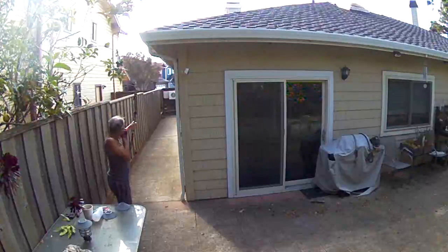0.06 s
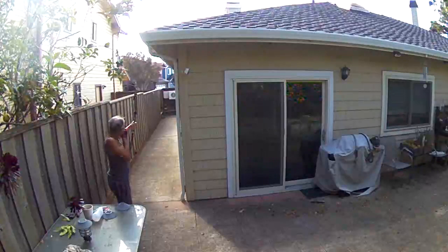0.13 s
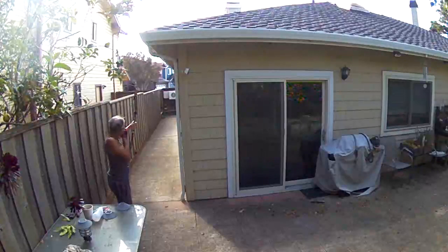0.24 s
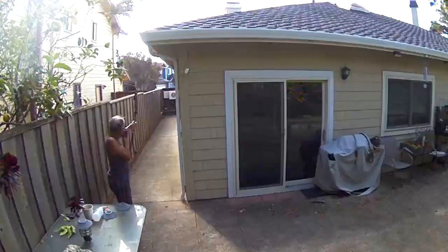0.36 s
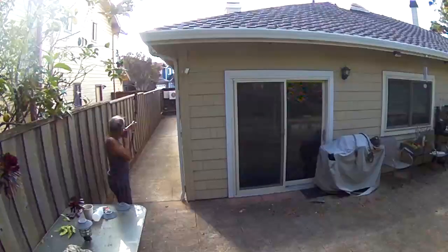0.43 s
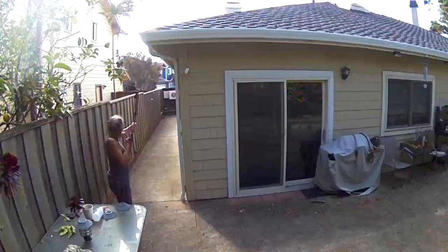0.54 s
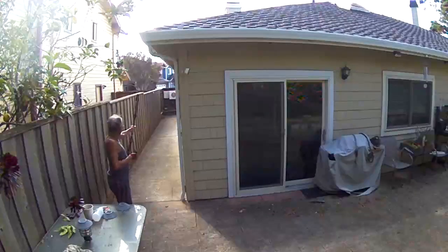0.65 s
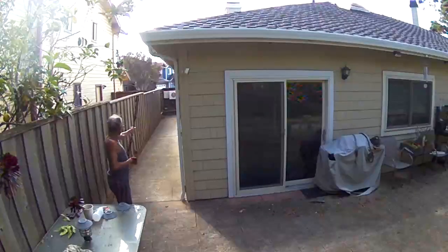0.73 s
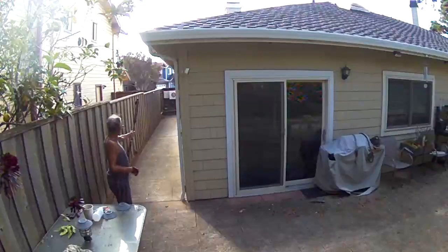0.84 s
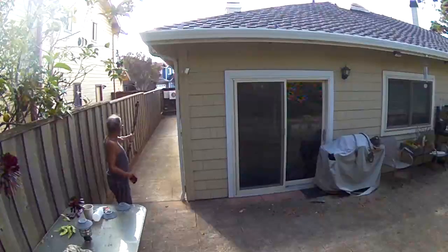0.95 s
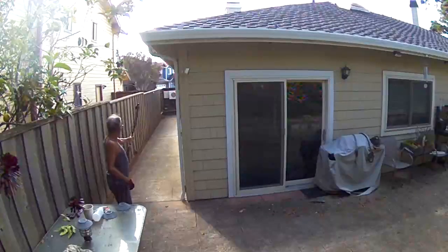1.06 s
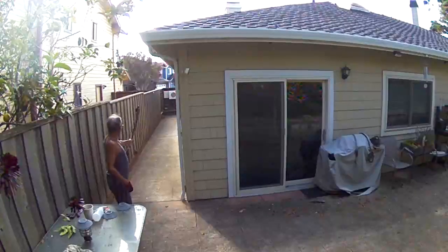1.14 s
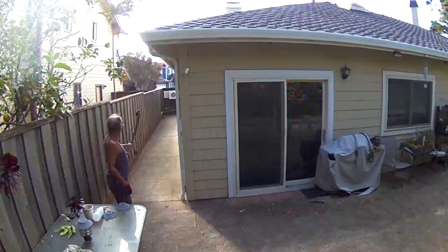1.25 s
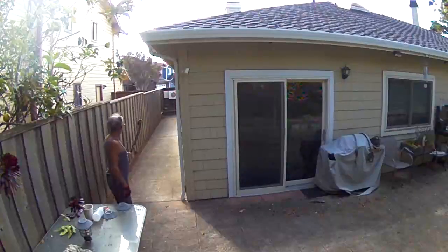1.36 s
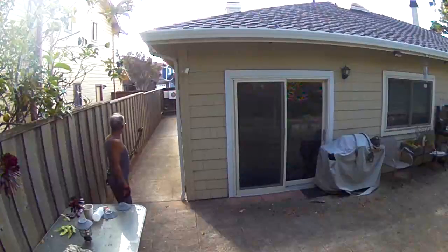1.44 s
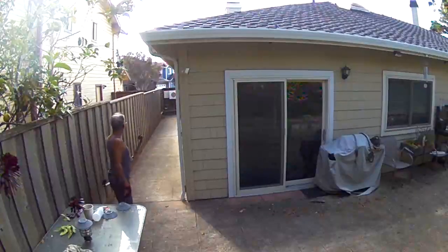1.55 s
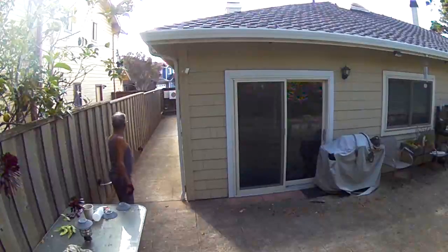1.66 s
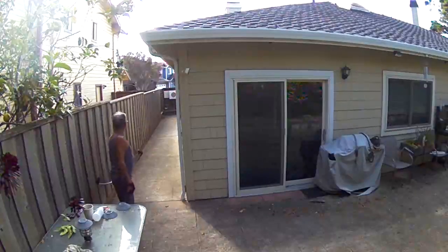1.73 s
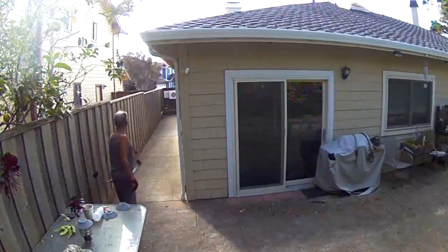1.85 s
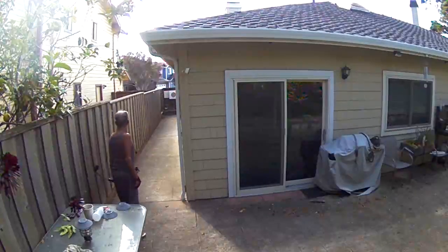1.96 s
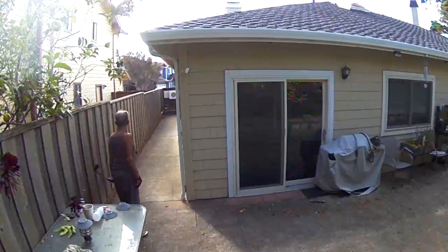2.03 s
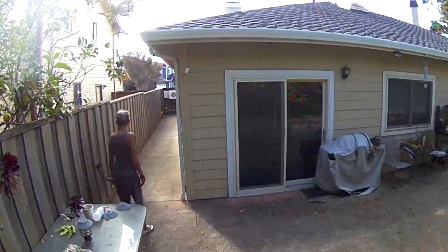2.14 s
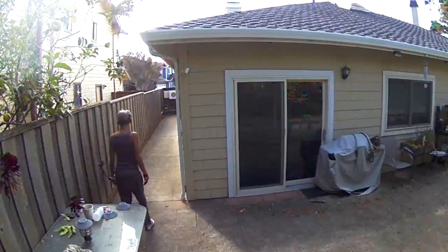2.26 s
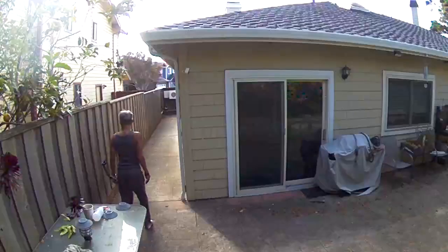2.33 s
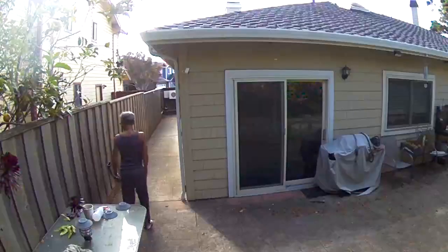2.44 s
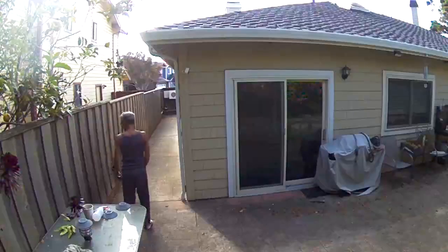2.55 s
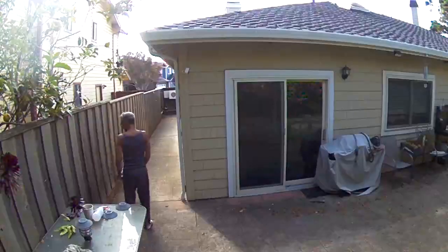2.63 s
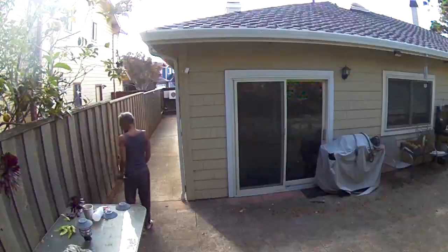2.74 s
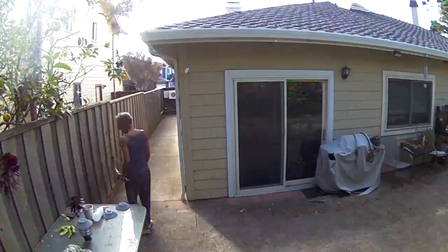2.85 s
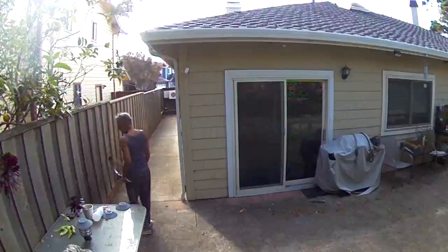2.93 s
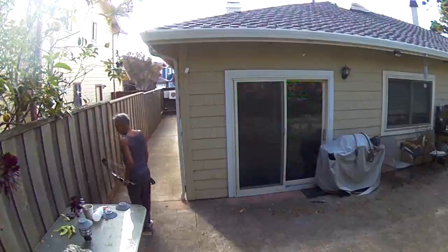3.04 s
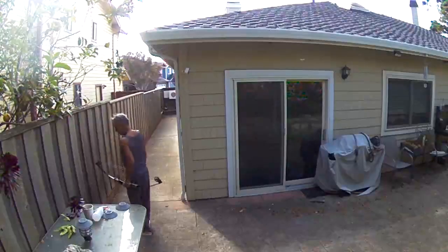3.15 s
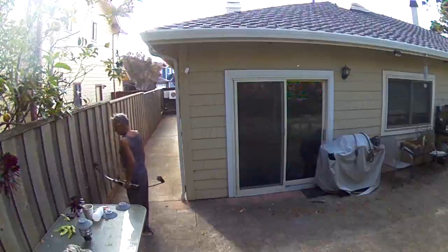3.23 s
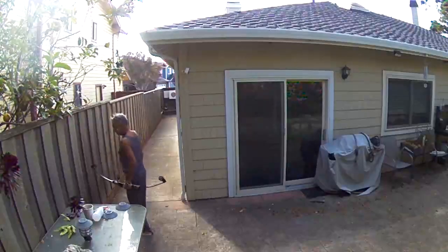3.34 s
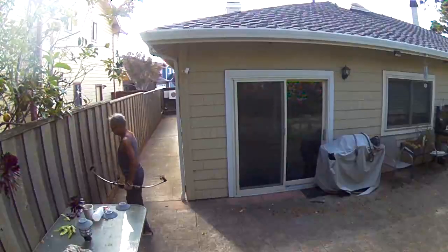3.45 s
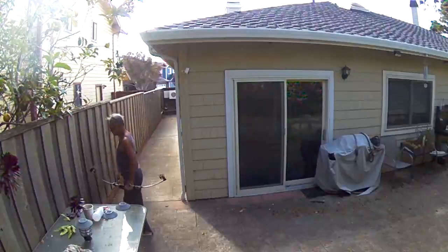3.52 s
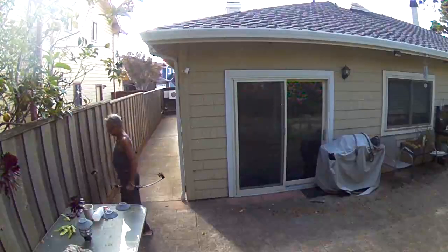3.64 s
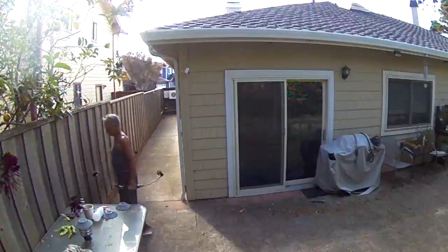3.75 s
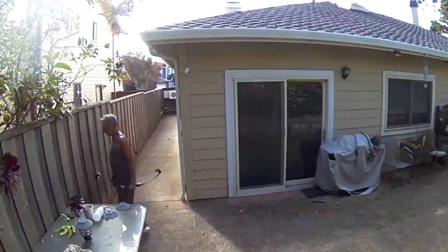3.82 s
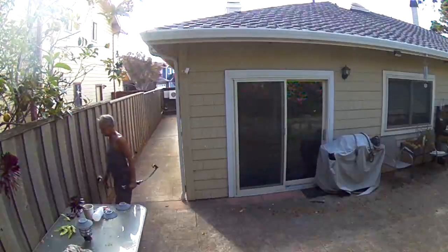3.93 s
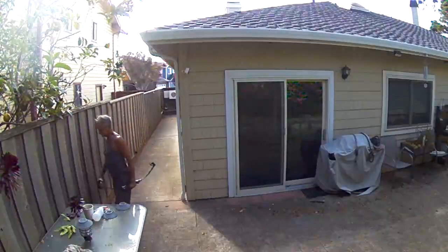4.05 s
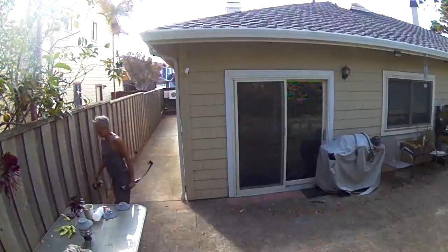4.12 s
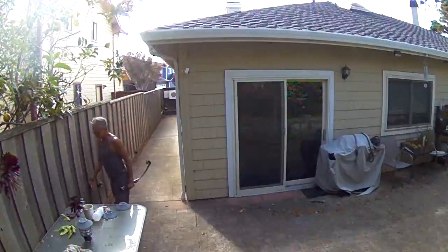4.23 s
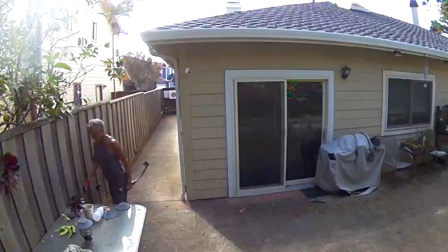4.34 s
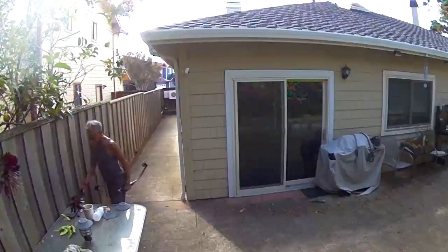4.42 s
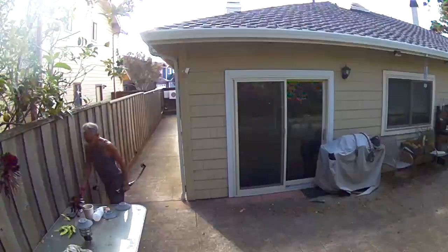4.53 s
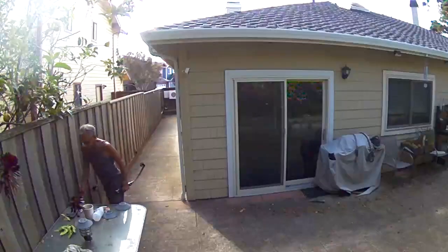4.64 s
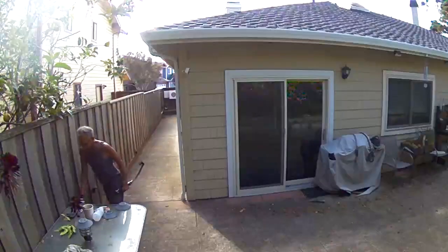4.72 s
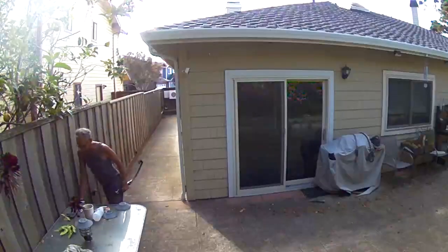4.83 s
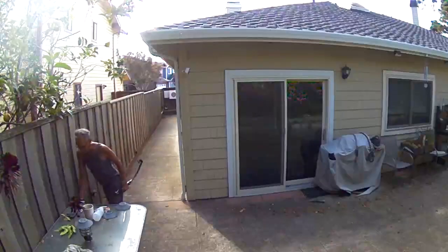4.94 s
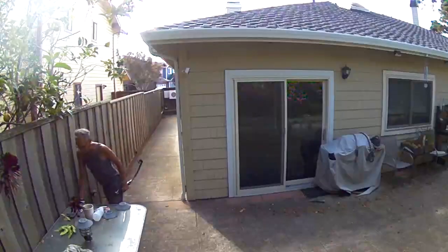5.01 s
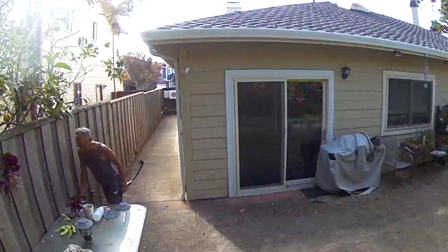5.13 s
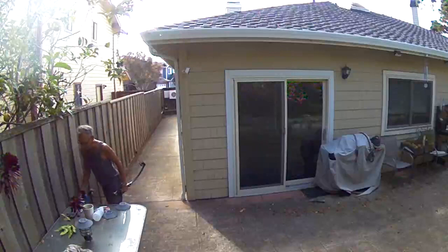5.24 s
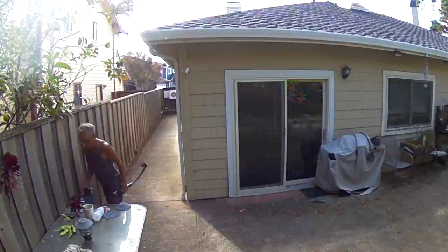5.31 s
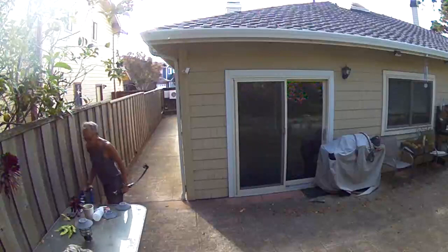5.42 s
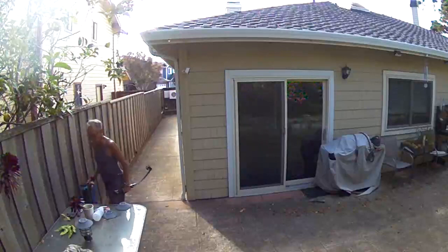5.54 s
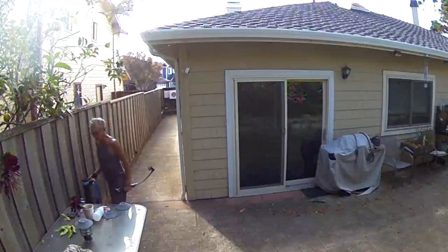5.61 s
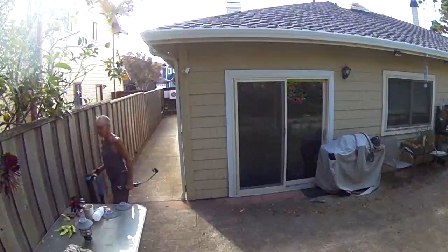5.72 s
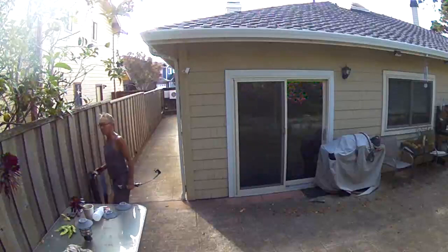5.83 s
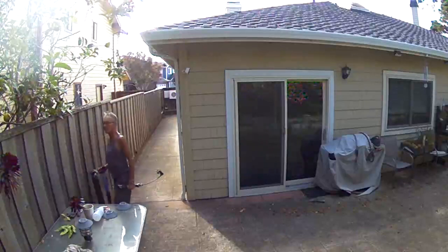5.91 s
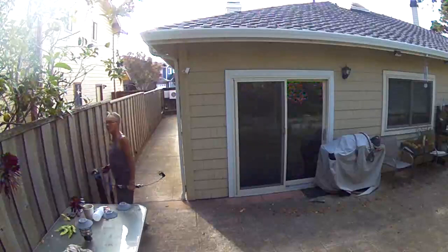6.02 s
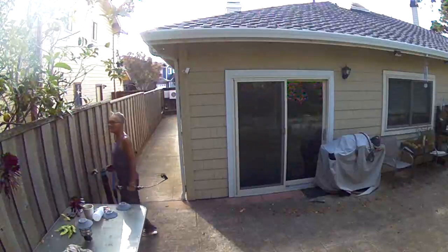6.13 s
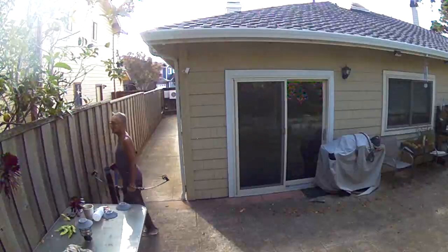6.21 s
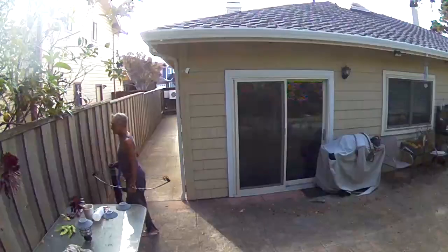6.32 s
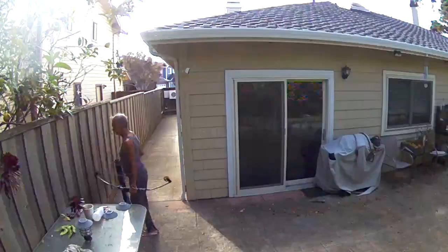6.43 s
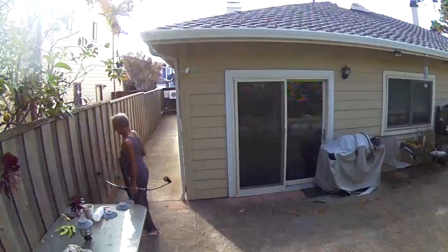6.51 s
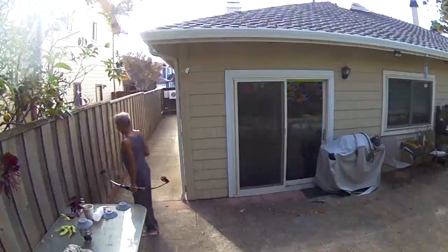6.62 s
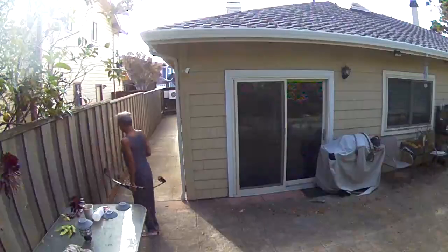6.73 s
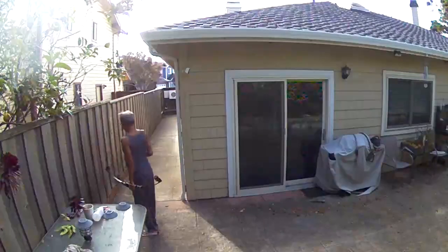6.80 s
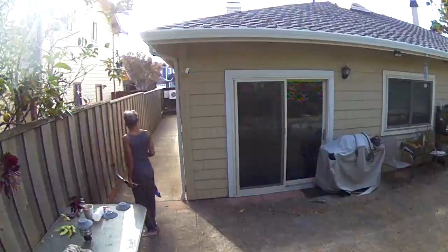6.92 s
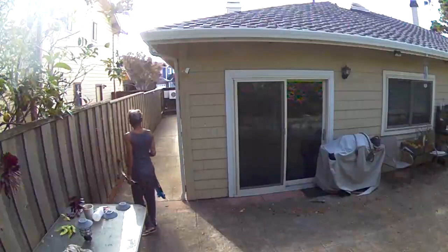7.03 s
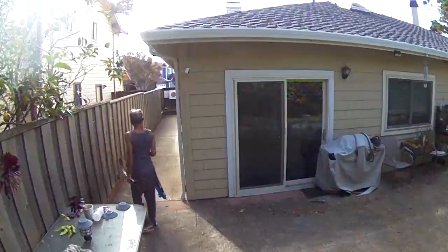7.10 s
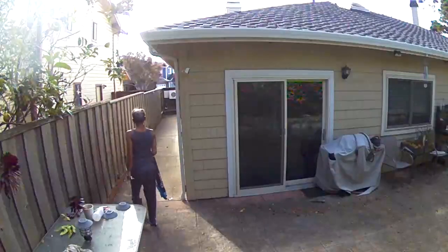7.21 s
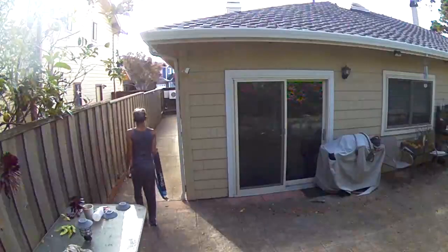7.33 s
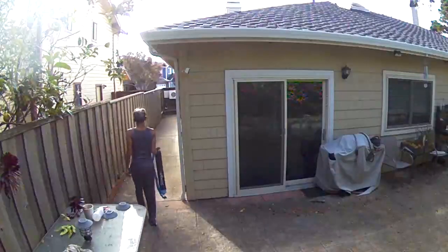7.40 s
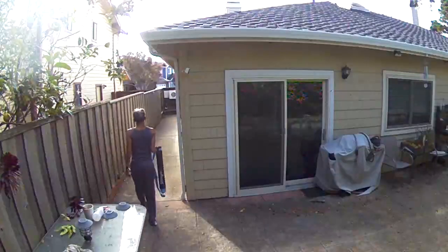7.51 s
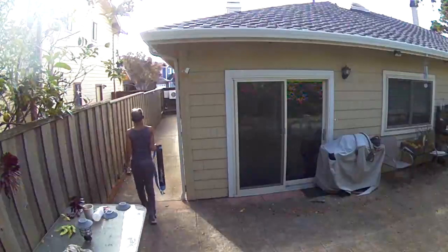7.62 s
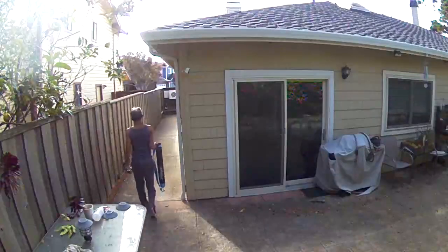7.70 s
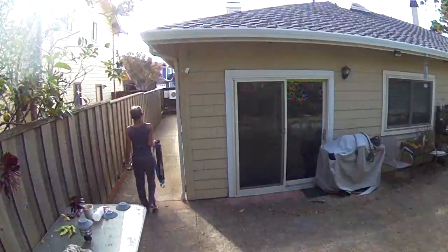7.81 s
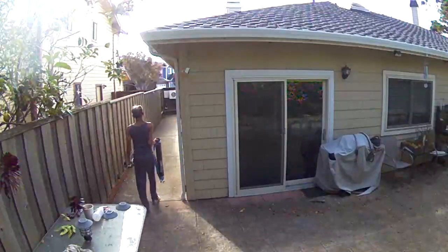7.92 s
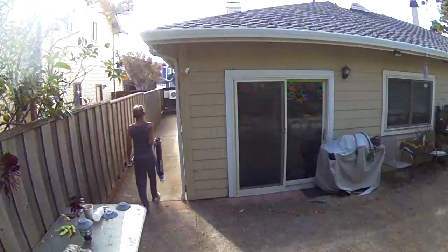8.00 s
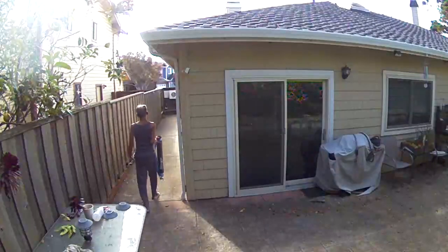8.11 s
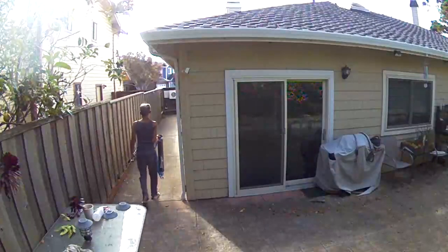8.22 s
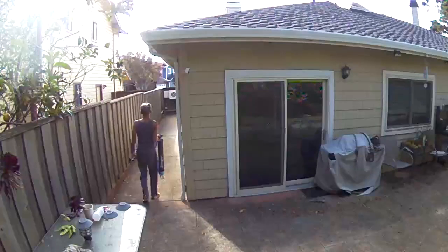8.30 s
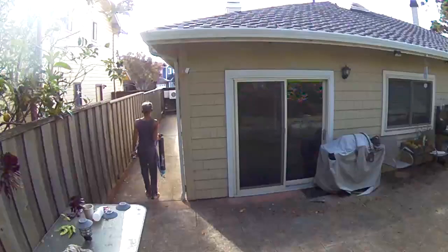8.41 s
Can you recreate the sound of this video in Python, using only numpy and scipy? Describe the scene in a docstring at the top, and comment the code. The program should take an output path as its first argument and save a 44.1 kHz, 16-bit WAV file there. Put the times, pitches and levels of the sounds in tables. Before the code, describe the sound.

A quiet backyard alley between a house wall and wooden fence, heard by one fixed microphone with muted highest treble. Low outdoor rumble, faint hiss and a distant vehicle drone that fades over the first few seconds. At 0.6 s a bow releases: a very quick, bright, dry snap with a hissing, fluttering echo and faint low string hum. At 1.1 s the arrow strikes the target: a loud woody boom with tearing crunch, clap-like reflections and a short ringing tail. A dull bump at 1.6 s, then faint gritty scuffs from 1.8 to 4 s, with wind puffs around 3 to 3.6 s. At 4.4 s a tiny falling squeak and rub. From 5.1 to 5.8 s arrows rattle in a quiver, with hard knocks at 5.28 and, loudest, 5.41 s. Soft scuffs follow, a sharp footfall clack at 7.05 s, and crunchy steps at 7.6, 7.8 and 8.1 s.

```python
"""An archer's bow snaps: a run of bright noise bursts looses an arrow down an alley between house and fence.
Half a second later it thuds into the target: ringing tones and tearing noise, with echoes from the alley.
The archer shuffles on gritty concrete (bursts of tiny clicks), gives a falling squeak, lifts a rattling
quiver (knocks with ringing shafts) and takes some steps, over low outdoor rumble and puffs of wind (noise)."""
import sys
import numpy as np
from scipy import signal
from scipy.fft import rfft, irfft
from scipy.io import wavfile
from scipy.ndimage import uniform_filter1d

SR = 44100
rng = np.random.default_rng(int(sys.argv[2]) if len(sys.argv) > 2 else 0)


def dump_mix(stems):
    """Bounce the given channels to the path in sys.argv[1] as a 16-bit WAV at rate SR."""
    frames = np.atleast_2d(stems).T  # one column per channel
    limited = np.clip(frames, -1, 1)  # hard clip at full scale
    pcm = np.round(limited * 32767).astype(np.int16)
    wavfile.write(sys.argv[1], SR, pcm)


N = 373086  # length of the scene [samples]
EDGE_HZ = 7570  # upper edge of the sound [Hz]
T = np.arange(SR) / SR  # one second, the longest life of a single dry sound [s]
HZ = np.fft.rfftfreq(4096, 1 / SR)  # frequencies at which the colouring filters are drawn [Hz]

# colour of grit under a shoe: (frequency [Hz], relative level [dB])
GRIT_COLOUR = [(300, -22.5), (800, -8.5), (1500, -5), (2000, 2.5), (3000, -0.5), (4200, 2), (5500, 1.5),
               (6800, 0.5), (7600, -15.5)]
# colour the quiver's tube gives to knocks: (frequency [Hz], relative level [dB])
QUIVER_COLOUR = [(180, -32), (350, -15.5), (550, -9), (750, -2.5), (980, -6), (1250, -9), (1650, -8.5),
                 (2050, -4.5), (2450, -10.5), (2950, -6.5), (3600, -12.5), (4900, -9.5), (6000, -16),
                 (6800, -13.5), (7500, -26)]


def gain_of(db):
    """Turns decibels into an amplitude factor."""
    return 10 ** (np.asarray(db) / 20)


def evened(x):
    """Scales a sound to an average strength (rms) of 1."""
    return x / np.sqrt(np.mean(x ** 2) + 1e-20)


def read(points, hz):
    """Reads a table between its points, along a logarithmic frequency axis."""
    f, value = np.transpose(points)
    return np.interp(np.log(hz + 1), np.log(f + 1), value)


def add(mix, s, sound):
    """Mixes a sound in at time s [s]."""
    start = max(round(s * SR), 0)
    part = mix[start:][:len(sound)]
    part += sound[:len(part)]


def colour(x, spectrum, tilt_db=0):
    """Filters with a spectrum tilted by tilt_db per octave above 400 Hz; the filter has unit energy."""
    level = read(spectrum, HZ) + tilt_db * np.log2(np.clip(HZ, 400, EDGE_HZ))
    # folding the cepstrum makes the filter respond as early as it can, never before its input
    cepstrum = irfft(np.log(gain_of(level - level.max()) + 1e-5))
    cepstrum[1:len(HZ) - 1] *= 2
    cepstrum[len(HZ):] = 0
    taps = irfft(np.exp(rfft(cepstrum)))
    taps = taps / np.linalg.norm(taps)
    return signal.fftconvolve(x, taps)[:len(x)]


def swell(rise, t60):
    """Grows to 1 in the rise time [s], then falls by 60 dB in every t60 [s]."""
    rise = max(rise, 1e-4)
    growth = np.minimum(T / rise, 1)
    decay = np.exp(-np.log(1000) * np.maximum(T - rise, 0) / max(t60, 1e-3))
    return growth * decay


def arch(length, skew=1, sharpness=1):
    """Swells and fades within the length [s]; a skew under 1 brings the top forward."""
    return np.abs(np.sin(np.pi * np.minimum(T / length, 1) ** skew)) ** sharpness


def grains(per_s, spread_db):
    """Scatters tiny clicks of uneven size over one second, as rough contacts do."""
    chance, size, sign = rng.random(SR), rng.exponential(1, SR), rng.choice([-1, 1], SR)
    clicks = (chance < per_s / SR) * sign
    return evened(clicks * gain_of(spread_db * np.minimum(size, 4)))


def ring(modes):
    """Sounds dying tones together: (frequency [Hz], level [dB], t60 [s], rise [s])."""
    return sum(gain_of(db) * swell(rise, t60) * np.sin(2 * np.pi * hz * T) for hz, db, t60, rise in modes)


def steady(spectrum):
    """Makes noise of a given colour for the whole scene, by shaping its frequencies."""
    noise = rfft(rng.standard_normal(N))
    return evened(irfft(noise * gain_of(read(spectrum, np.fft.rfftfreq(N, 1 / SR))), N))


def alley_tail():
    """Dense reflections between fence and wall; each pitch dies at its own rate, the lowest most slowly."""
    # how long the echo takes to fall by 60 dB: (frequency [Hz], t60 [s])
    alley_t60 = [(150, 0.62), (300, 0.45), (800, 0.42), (2500, 0.4), (5000, 0.34), (7500, 0.44)]
    hz, t, z = signal.stft(grains(6000, 0), SR, nperseg=256)
    decay = np.exp(-np.log(1000) * t / read(alley_t60, hz)[:, None])
    return signal.istft(z * decay, SR, nperseg=256)[1][:SR]


def yard(x, wet_db, slap_db):
    """Adds the alley's dense tail and four single slaps from the walls."""
    response = alley_tail() * np.minimum(T / 0.011, 1)
    response *= gain_of(wet_db) / np.linalg.norm(response)
    for delay in (.0175, .0315, .0605, .063):
        add(response, delay, gain_of([slap_db]))
    return x + signal.fftconvolve(x, response)[:N]


def air():
    """Steady rumble and hiss, the drone of a far vehicle fading away, and wind buffeting the microphone."""
    # colours of the outdoor air, the vehicle and the wind: (frequency [Hz], relative level [dB])
    air_colour = [(12, -33.5), (22, -6), (54, 2), (76, -1), (98, -7), (182, -12), (284, -17), (402, -20.5),
                  (560, -23), (740, -22), (1100, -27.5), (1700, -29), (2000, -28.5), (3000, -32),
                  (6800, -33), (7500, -47)]
    drone_colour = [(60, -18.5), (130, 4.5), (190, 1.5), (280, -3), (400, -19.5), (900, -47.5),
                    (3000, -56.5)]
    buffet_colour = [(15, -6), (28, -4), (60, 3), (100, -4), (150, -15.5), (300, -58), (900, -71)]
    # the vehicle's loudness: (time [s], level [dB])
    traffic = [(0, -56.5), (1.7, -57.5), (3.2, -63.5), (4.4, -61), (5.6, -65), (8.46, -66)]
    # puffs of wind: (middle [s], half width [s], level [dB])
    puffs = [(2.935, 0.043, -48), (3.075, 0.071, -45.5), (3.395, 0.12, -40), (3.608, .016, -42),
             (4.72, .3, -54)]
    t = np.arange(N) / SR
    gust = sum(gain_of(db) * np.exp(-((t - s) / width) ** 2) for s, width, db in puffs)
    wind = gust * steady(buffet_colour)
    drone = gain_of(np.interp(t, *np.transpose(traffic))) * steady(drone_colour)
    return gain_of(-53.5) * steady(air_colour) + drone + wind


def bumps():
    """Bumps of heels and gear: short bursts of clicks, with no tones of their own."""
    # (time [s], level [dB], brightness [dB per octave])
    blows = [(1.641, -49.5, -13), (3.758, -52.5, -15), (5.488, -43, 8), (5.831, -53, 11.5)]
    # colour of a dull blow: (frequency [Hz], relative level [dB])
    dull = [(60, -17), (170, -3), (270, 3.5), (380, -4), (560, -7), (800, -4), (1200, -26.5), (3000, -38),
            (7500, -63)]
    out = np.zeros(N)
    for s, db, tilt_db in blows:
        burst = grains(6000, 2.4) * swell(rise=.009, t60=0.067)
        add(out, s, gain_of(db) * colour(burst, dull, tilt_db))
    return yard(out, wet_db=-8.5, slap_db=-28)


def steps():
    """Grit crackles sharply under a landing heel and swells under a sliding sole; one footfall clacks."""
    # heels landing on gritty concrete: (time [s], level [dB], t60 [s])
    heels = [(3.124, -50.5, .075), (3.9, -60, .065), (7.615, -51, .27), (7.833, -48.5, .14),
             (8.12, -45, .17)]
    # soles sliding over the grit: (time [s], length [s], level [dB], brightness [dB per octave])
    scuffs = [(1.789, .12, -64, 2), (1.916, .04, -59.5, 7), (2.449, .075, -53.5, 0), (2.64, .125, -54, 2),
              (3.261, .22, -56.5, -.5), (3.944, .085, -56, 1.5), (4.91, 0.073, -60, 8),
              (5.822, .08, -54, 0), (6.18, .09, -61, 4), (6.215, 0.17, -52.5, -7), (6.409, 0.16, -61, -3.5),
              (6.982, .14, -56, -3), (7.22, .07, -53.5, 3), (8.142, 0.13, -51, 0),
              (8.334, 0.072, -58, -1.5)]
    # colour of the one hard footfall: (frequency [Hz], relative level [dB])
    clack_colour = [(200, -20), (450, -8), (750, -14), (1300, -3), (1750, -3.5), (2200, 3.5), (2700, -2.5),
                    (3500, -6.5), (5500, -14.5), (7000, -15.5), (7600, -33)]
    out = np.zeros(N)
    for s, db, t60 in heels:
        crackle = grains(4000, 1.9) * swell(.004, t60)
        add(out, s, gain_of(db) * colour(crackle, GRIT_COLOUR, tilt_db=.5))
    for s, length, db, tilt_db in scuffs:
        # the weight comes onto the sole quickly and leaves it slowly
        slide = grains(5000, 2.2) * arch(length, skew=0.56, sharpness=1.6)
        add(out, s, gain_of(db) * colour(slide, GRIT_COLOUR, tilt_db))
    clack = grains(3500, 2.6) * swell(rise=0.0013, t60=.1)
    add(out, 7.0475, gain_of(-37.5) * colour(clack, clack_colour))
    return yard(out, wet_db=-7.0, slap_db=-28)


def squeak():
    """A stick-slip squeak as the archer stoops for the quiver: a falling, rough tone with a raspy end."""
    # colour of the rub after the squeak: (frequency [Hz], relative level [dB])
    rustle_colour = [(500, -11), (1700, -3), (2300, -12), (2700, -3), (3300, 3), (4200, -14), (7500, -21)]
    start_s, length_s = 4.386, 0.024
    start_hz, fall_hz_per_s = 2534, 17000  # the pitch falls as the rub slows
    pitch = start_hz - fall_hz_per_s * np.minimum(T, length_s)
    # fast random roughness of pitch (jitter) and of loudness (shimmer)
    jitter, shimmer = evened(uniform_filter1d(rng.standard_normal((2, SR)), size=30))
    phase = 2 * np.pi * np.cumsum(pitch * (1 + 0.029 * jitter)) / SR
    tone = np.sin(phase) + gain_of(-5) * np.sin(2 * phase) + gain_of(-11) * np.sin(3 * phase)
    tone = tone * (1 + 0.36 * shimmer) * arch(length_s, sharpness=0.31)
    rasp = colour(grains(4000, 2.5) * swell(.023, 0.11), GRIT_COLOUR, 9.5)
    rub = colour(grains(4000, 1.7) * swell(0.032, 0.2), rustle_colour)
    out = np.zeros(N)
    add(out, start_s, gain_of(-46) * tone)
    add(out, start_s + .003, gain_of(-45) * rasp)
    add(out, start_s + 0.023, gain_of(-51) * rub)
    return yard(out, wet_db=-7.0, slap_db=-30)


def knock(db, pitch, top):
    """A cluster of contacts with its own pitch, coloured by the tube; the shafts ring a little differently."""
    # ringing arrow shafts: (middle frequency [Hz], relative level [dB], t60 [s])
    shaft_modes = [(823, -22, 0.15), (2070, -13, .09), (2760, -13.5, 0.031), (3030, -15.5, .09),
                   (5330, -24, .06)]
    # a harder knock gathers more contacts, so it builds longer, and is stopped sooner
    harder_db = db + 40  # against a knock of medium force, at -40 dB
    rise = .004 * 2 ** (harder_db / 20.5)  # doubles every 20.5 dB
    t60 = 0.06 / 2 ** (harder_db / 20)  # halves every 20 dB
    contacts = grains(10000, 3.0)
    contacts += gain_of(4) * signal.lfilter(*signal.iirpeak(pitch, 4, fs=SR), contacts)
    contacts = signal.sosfilt(signal.butter(8, top, fs=SR, output="sos"), contacts)
    # contacts pitched above 2450 Hz are brighter, lower ones duller
    tilt_db = 4 * np.log2(pitch / 2450)
    clack = evened(colour(contacts, QUIVER_COLOUR, tilt_db)) * swell(rise, t60)
    modes = []
    for hz, level, decay in shaft_modes:
        shaft_hz = hz * (1 + .025 * rng.standard_normal())
        modes.append((shaft_hz, level, decay, rise))
    return gain_of(db) * (clack + gain_of(-8.5) * ring(modes))


def quiver():
    """Single knocks stand out of a loose jostle of arrows, made of sparse clicks, as the quiver is lifted."""
    # arrows knocking; the last row is a bright heel landing on grit, made in the same way:
    # (time [s], level [dB], pitch of the contact [Hz], top edge [Hz])
    knocks = [(4.218, -56.5, 5450, 7000), (4.303, -52, 3800, 4500), (5.077, -55, 4820, 5200),
              (5.101, -52, 1300, 5000), (5.246, -55, 2000, 6000), (5.27, -50, 1600, 5500),
              (5.284, -32, 2050, 5700), (5.35, -44.5, 2190, 6530), (5.373, -46, 2000, 6500),
              (5.392, -47, 2600, 6200), (5.4145, -25.5, 2850, 7300), (5.569, -40.5, 2800, 6960),
              (5.624, -42.5, 2040, 4220), (5.722, -56, 2700, 6500), (5.832, -49.5, 2100, 6500),
              (6.16, -54, 6740, 7300)]
    out = np.zeros(N)
    for s, db, pitch, top in knocks:
        add(out, s, knock(db, pitch, top))
    jostle = grains(per_s=900, spread_db=2.2) * arch(length=.25, skew=0.97, sharpness=0.44)
    add(out, 5.245, gain_of(-52.5) * colour(jostle, QUIVER_COLOUR, tilt_db=-4))
    return yard(out, wet_db=-8.5, slap_db=-28)


def target():
    """The tip tears in as noise and the face booms in dying tones; the back of the yard answers with a clap."""
    # tones of stand, face and arrow shaft: (frequency [Hz], relative level [dB], t60 [s], rise [s])
    target_modes = [(45.6, -40.5, 1, 0.025), (160.5, -22.5, 0.1, 0.0038), (279, -14.5, 0.036, 0.0044),
                    (372.7, -27.5, 0.24, 0.0019), (498, -39.5, 0.22, 0.02), (657, -35.5, 0.054, 0.00083),
                    (1500, -34.5, 0.036, .0005), (2725, -37.5, 0.076, .0005), (3714, -36, 0.043, .0005),
                    (6480, -42, 0.029, 0.00042)]
    # ways the boom arrives, direct and off the side fence: (delay [s], gain [dB])
    paths = [(0, -1.5), (.0071, 4.5)]
    # colours of the tip tearing in and of the yard's answer: (frequency [Hz], relative level [dB])
    crunch_colour = [(200, -6.5), (480, 7), (900, -1), (1450, 0.5), (2200, -4), (2800, -2), (4000, -11),
                     (5200, -15.5), (6500, -7.5), (7500, -31.5)]
    far_colour = [(59, -26), (110, -10.5), (210, -8), (270, -3.5), (380, -7), (520, -6.5), (650, -8.5),
                  (820, -6.5), (1150, -13), (1600, -14), (1880, -11), (2180, -14), (2580, -13.5),
                  (3300, -20.5), (4500, -23), (6700, -37), (7500, -52)]
    # tones that linger in the echo: (frequency [Hz], relative level [dB], t60 [s], rise [s])
    linger = [(264, -27, 0.37, 0.0044), (825, -24, .11, 0.0076), (961, -33.5, 0.22, 0.006)]
    hit_s = 1.1005
    out = np.zeros(N)
    boom = -ring(target_modes)  # minus: the face is first pushed away
    for delay, db in paths:
        add(out, hit_s + delay, gain_of(db) * boom)
    crunch = grains(5000, 3.9) * swell(0.0016, 0.27)
    add(out, hit_s, gain_of(-30) * colour(crunch, crunch_colour))
    board_scatter = grains(4600, 1.7) * swell(0.0065, .2)  # off the fence boards
    add(out, hit_s + .02, gain_of(-27.5) * colour(board_scatter, far_colour, -2.7))
    clap = gain_of(-27.5) * alley_tail() * np.minimum(T / 0.0037, 1)
    clap += gain_of(-29) * grains(4000, 1.9) * swell(0.0041, 0.14)
    add(out, hit_s + .0452, colour(clap, far_colour))
    add(out, hit_s + .047, gain_of(-3) * ring(linger))
    return yard(out, wet_db=-18, slap_db=-29)


def bow():
    """String and arrow give quick bursts of bright clicks; the alley hisses back and the string hums faintly."""
    # string slipping, string snapping home, arrow scraping past: (time [s], level [dB], rise [s], t60 [s])
    release = [(.591, -53, 0.012, 0.18), (0.6175, -38, 0.0086, .03), (0.6254, -23.5, 0.00067, 0.024),
               (.632, -30.5, 0.0026, 0.071)]
    # colour of the snaps: (frequency [Hz], relative level [dB])
    bow_colour = [(120, -32), (200, -20), (400, -20.5), (600, -11.5), (1290, -19.5), (1670, -13.5),
                  (1850, -8), (2800, -10.5), (3400, -8), (4000, -4), (4900, 0), (5500, -3.5), (6100, -8.5),
                  (7000, -9.5), (7500, -28)]
    # the string rings on: (frequency [Hz], level [dB], t60 [s], rise [s])
    twang = [(280, -51.5, 0.73, 0.014)]
    out = np.zeros(N)
    for s, db, rise, t60 in release:
        snap = grains(12000, 1.2) * swell(rise, t60)
        add(out, s, gain_of(db) * colour(snap, bow_colour, 0.91))
    out = yard(out, wet_db=-17, slap_db=-14.5)
    scatter = alley_tail() * np.minimum(T / 0.039, 1)  # builds up from board after board
    add(out, .628, gain_of(-33.0) * colour(scatter, bow_colour, -0.91))
    add(out, .635, ring(twang))
    return out


def scene():
    """Adds up all sources at one microphone."""
    background = air() + bumps()
    archer = steps() + squeak() + quiver()
    shot = target() + bow()
    return (background + archer + shot)[None]


def record(dry):
    """The recorder's narrow band: a steep low-pass filter removes the sound above the upper edge."""
    low_pass = signal.firwin(301, EDGE_HZ, window=("kaiser", 8), fs=SR)
    return signal.oaconvolve(dry, low_pass[None], "same")


dry = scene()
out = record(dry)
dump_mix(out)
```